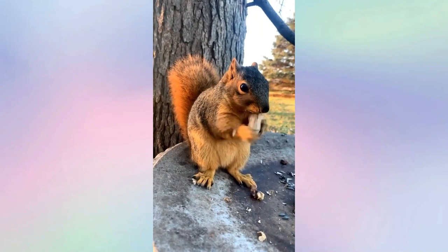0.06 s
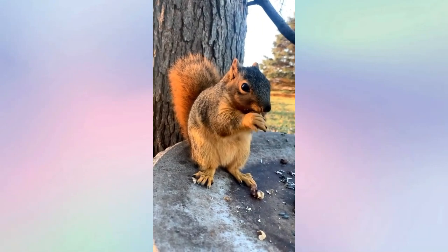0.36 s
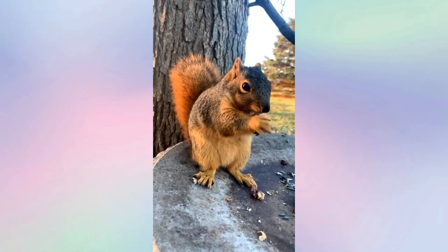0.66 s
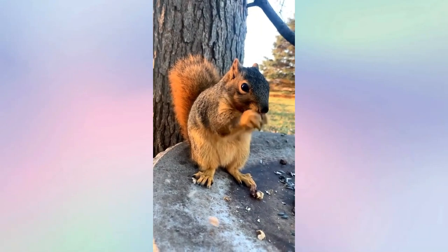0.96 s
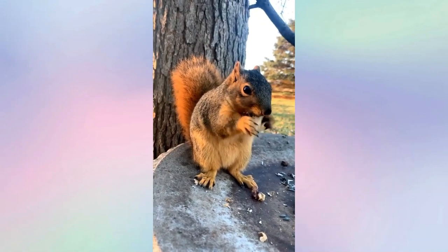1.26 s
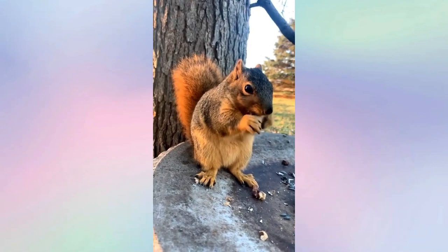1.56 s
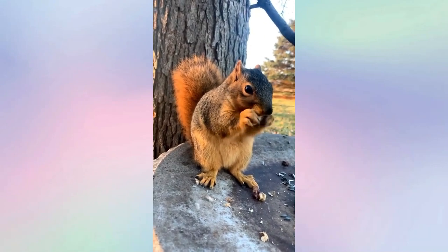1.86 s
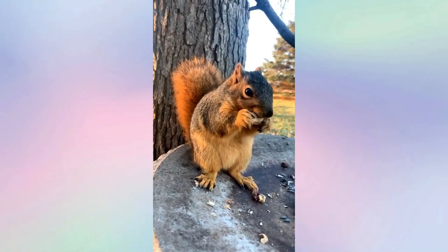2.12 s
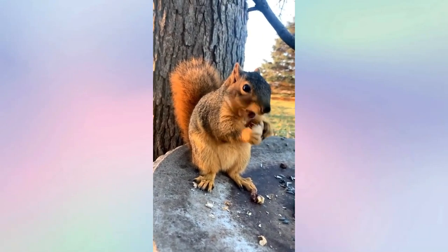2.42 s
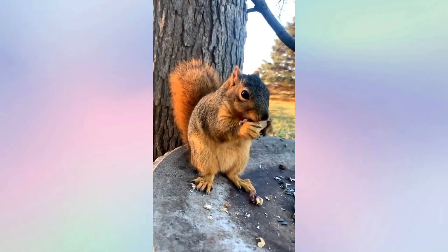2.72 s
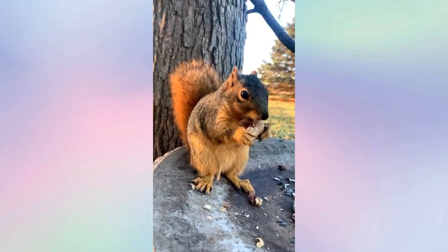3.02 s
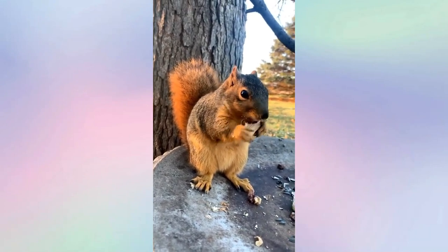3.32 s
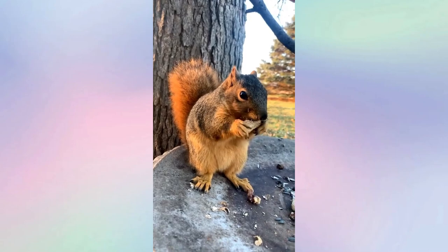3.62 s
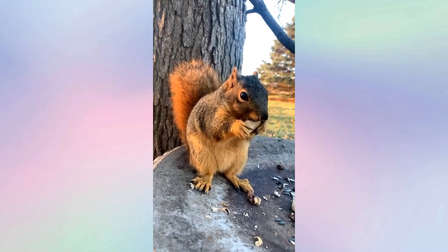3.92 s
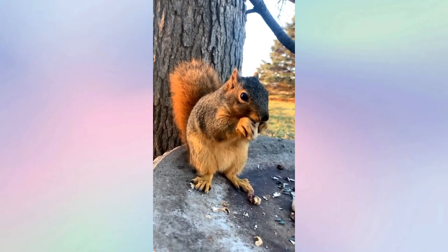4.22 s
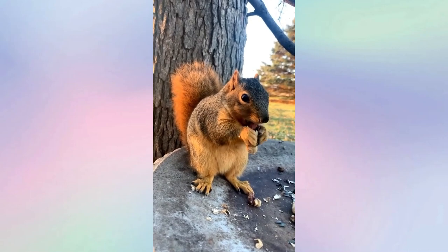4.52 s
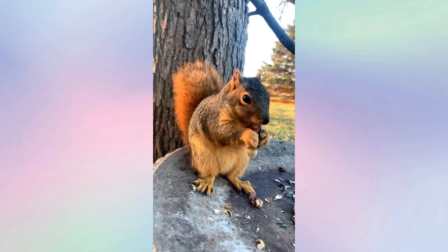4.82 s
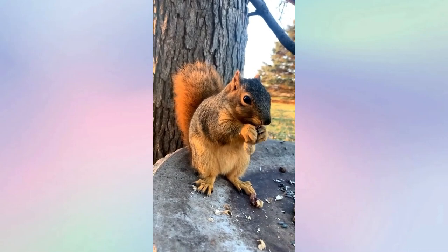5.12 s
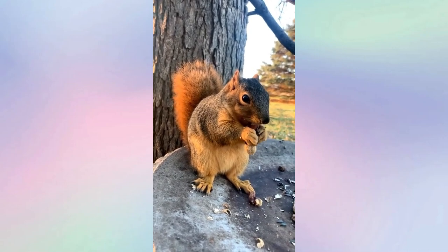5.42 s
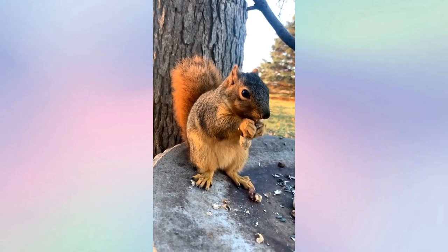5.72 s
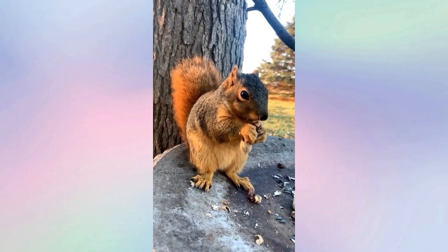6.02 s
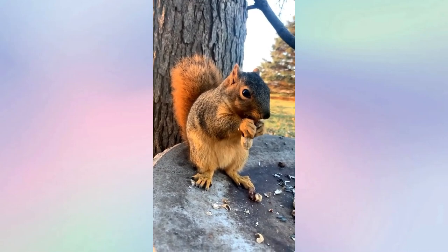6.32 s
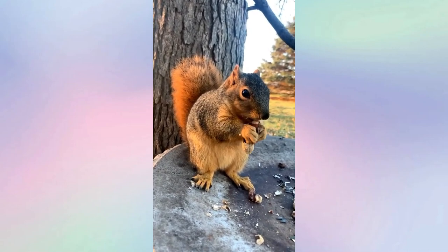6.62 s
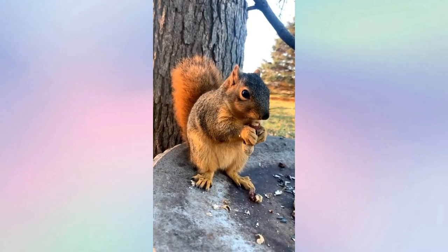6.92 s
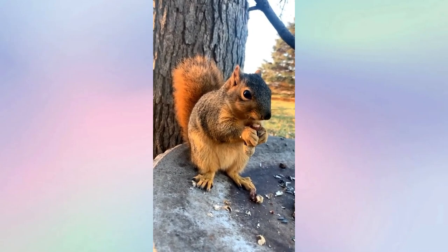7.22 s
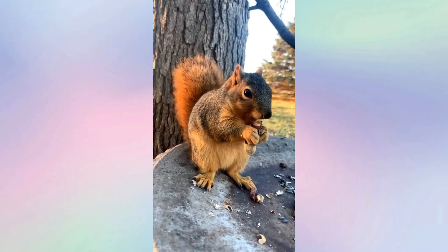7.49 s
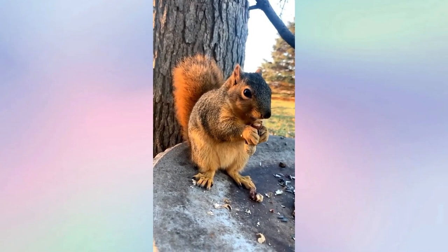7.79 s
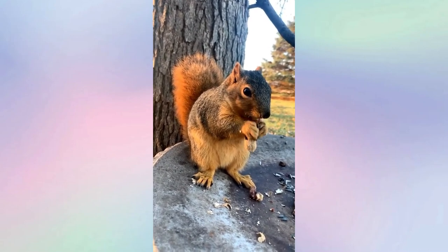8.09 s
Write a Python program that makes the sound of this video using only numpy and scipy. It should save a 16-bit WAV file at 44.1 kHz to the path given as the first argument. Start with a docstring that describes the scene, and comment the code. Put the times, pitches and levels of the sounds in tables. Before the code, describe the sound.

Crisp snaps of a nutshell give way to soft squirrel nibbling, with distant birds, faint barks and low traffic behind.

```python
"""A concrete table in a park, one microphone close to a squirrel, distant traffic rumbling throughout.
Far birds, probably jays, start to whistle as the squirrel splits a nut shell with its teeth: each
fracture is a sharp snap among crumbs, mirrored by the table top and answered faintly by the trees.
From about 3.5 s the jays also squawk and a dog barks far away, while the squirrel nibbles the kernel
with short scrapes, softer cracks and small ticks of the teeth."""
import sys
import numpy as np
from scipy import signal
from scipy.fft import rfft, irfft, next_fast_len
from scipy.io import wavfile
from scipy.ndimage import map_coordinates

SR = 44100
rng = np.random.default_rng(int(sys.argv[2]) if len(sys.argv) > 2 else 0)


def store_pcm(level_fs):
    """Save levels as 16-bit WAV."""
    pcm = np.round(np.clip(level_fs, -1, 1) * 32767).astype(np.int16)
    wavfile.write(sys.argv[1], SR, np.atleast_2d(pcm).T)


N = 359415

# the colour of breaking shell, close up: (frequency [Hz], relative level [dB])
SHELL_SPECTRUM = [(100, -22), (400, -20.5), (1100, -16.5), (1900, -7.5), (2700, -3), (3500, 0.5),
                  (4500, -2.5), (6300, -5), (8200, 0.5), (10500, -4.5), (13000, -5.5), (15800, -15)]


def amp(db):
    """Decibels to gain."""
    return 10 ** (np.asarray(db) / 20)


def unit(x):
    """Scale to rms 1."""
    return x / np.sqrt(np.mean(x ** 2) + 1e-20)


def along(points, hz):
    """(Hz, value) points read on a log axis."""
    f, v = np.transpose(points)
    return np.interp(np.log(hz + 1), np.log(f + 1), v)


def wobble(rate):
    """A smooth random curve, rate knots a second."""
    return map_coordinates(rng.standard_normal(int(N * rate / SR) + 4), [np.arange(N) * rate / SR])


def filtered(x, gain):
    """x times a gain that depends on frequency."""
    size = next_fast_len(N + SR // 2)
    return irfft(rfft(x, size) * gain(np.fft.rfftfreq(size, 1 / SR)), size)[:N]


def coloured(x, spectrum):
    """x shaped by a spectrum, at rms 1."""
    return unit(filtered(x, lambda hz: amp(along(spectrum, hz))))


def add(track, s, sound):
    """Mix a sound into the track at time s."""
    start = int(np.clip(round(s * SR), 0, N))
    track[start:start + len(sound)] += sound[:N - start]


def trees(size=256):
    """The diffuse echo from the trees, at energy 1, the highest treble dying first."""
    # the echo's decay: (frequency [Hz], time to fall 60 dB [s])
    decay = [(300, 0.42), (6000, 0.58), (15000, 0.18)]
    hz, t, noise = signal.stft(rng.standard_normal(SR // 3), SR, nperseg=size)
    tail = signal.istft(noise * amp(-60 * t / along(decay, hz)[:, None]), SR, nperseg=size)[1]
    return tail / np.linalg.norm(tail)


def surroundings(table_s=.0034, table_db=-13, scatter_db=-14, scatter_t60=.01, trees_db=-24):
    """Nut to microphone: direct path, bounce off the table, nearby scatter and the far echo."""
    path = amp(trees_db) * trees()
    t = np.arange(len(path)) / SR
    scatter = rng.standard_normal(len(t)) * amp(-60 * t / scatter_t60)
    path += amp(scatter_db) * scatter / np.linalg.norm(scatter)
    path[0] += 1
    add(path, table_s, np.array([amp(table_db)]))
    return path


def traffic(level_db=-49, rise_db=1.5, waver_db=.8):
    """Distant traffic: a low rumble that wavers and slowly grows."""
    # the rumble's colour: (frequency [Hz], relative level [dB])
    rumble = [(15, -30), (30, -12.5), (48, 5), (62, -2), (80, 1.5), (98, -7.5), (113, 0), (132, -13),
              (160, -13), (210, -25.5), (320, -30), (1500, -82.5)]
    swell_db = np.linspace(-.5, .5, N) * rise_db + waver_db * wobble(4.4)
    return amp(level_db + swell_db) * coloured(rng.standard_normal(N), rumble)


def open_air(level_db=-64):
    """The soft, drifting hiss of open air around the microphone."""
    # the hiss's colour: (frequency [Hz], relative level [dB])
    hiss = [(100, 9.5), (400, -2), (1100, -2), (1600, -5), (3000, -10), (6000, -16.5), (9000, -15),
            (13000, -24), (15500, -51.5)]
    return amp(level_db + wobble(.56)) * coloured(rng.standard_normal(N), hiss)


def crackle(rate, spread_db):
    """Random tiny breaks of uneven size, rate a second, at rms 1."""
    sizes = amp(spread_db * np.clip(rng.standard_normal(N), -2, 2))
    breaks = (rng.random(N) < rate / SR) * sizes * rng.choice([-1, 1], N)
    return coloured(signal.fftconvolve(breaks, surroundings(scatter_db=3.5))[:N], SHELL_SPECTRUM)


def scraping():
    """Grainy friction on the nut, at rms 1."""
    return unit(amp(3 * wobble(400)) * coloured(rng.standard_normal(N), SHELL_SPECTRUM))


def paws(scrape, start_db=-61.5, calm_db_per_s=1.5):
    """The paws turn the food with a faint crackle, ever more quietly."""
    t = np.arange(N) / SR
    handling = unit(amp(4 * wobble(20)) * (crackle(rate=160, spread_db=3) + .5 * scrape))
    return amp(start_db - calm_db_per_s * t) * handling


def jay_note(hz, rasp, dull_db):
    """A jay's note on a pitch contour: rasp shakes the pitch, dull_db tilts partials above the second."""
    # the bird's throat: (frequency [Hz], relative level [dB])
    throat = [(1000, -23.5), (1500, -12.5), (1750, -17.5), (2800, -5.5), (4300, -8.5), (5800, -11.5),
              (8000, -25)]
    part = rng.integers(N - len(hz)) + np.arange(len(hz))
    shake = rasp * wobble(700)[part] + .014 * wobble(45)[part]
    phase = 2 * np.pi * np.cumsum(hz * (1 + shake)) / SR
    voice = sum(amp(along(throat, k * hz) + dull_db * max(k - 2, 0)) * np.sin(k * phase)
                for k in range(1, 5))
    swell = np.sqrt(np.abs(np.sin(np.linspace(0, np.pi, len(hz)))))
    return swell * unit(voice * amp(4 * wobble(70)[part]))


def whistles(scoop=.4, scoop_s=.027, arch=.2):
    """Clear jay whistles that scoop up to a wavering note and sag at the end."""
    # the whistles: (time [s], length [s], level [dB], pitch [Hz])
    calls = [(0.281, 0.14, -66.5, 1450), (0.725, 0.1, -61, 1330), (1.267, 0.24, -64, 1418),
             (3.333, 0.13, -55, 1800), (3.941, 0.13, -65, 1914), (4.496, .12, -62.5, 1495),
             (4.758, .13, -64, 1642), (5.915, .08, -84, 1700), (6.103, .24, -67.5, 1455),
             (6.402, 0.15, -68, 1567), (7.153, 0.11, -69, 1407), (8.022, 0.095, -65.5, 1375)]
    track = np.zeros(N)
    for s, length, db, pitch_hz in calls:
        progress = np.linspace(0, 1, int(length * SR))
        below = scoop * np.exp(-(progress * length / scoop_s) ** 2 / 2)
        sag = arch * np.maximum(progress - .5, 0) ** 2
        add(track, s, amp(db) * jay_note(pitch_hz * (1 - below - sag), rasp=.028, dull_db=-9))
    return track


def far_jays(echo_db=-5):
    """Whistles and squawks from far off, with their echo from the trees."""
    calls = whistles() + squawks()
    echo = amp(echo_db) * signal.fftconvolve(calls, trees())[:N]
    return (calls + echo) / np.hypot(1, amp(echo_db))


def nibbling(scrape, stroke_s=.009, squeak_hz=5650, squeak_q=7):
    """Close up, each stroke of the incisors is a short scrape that may squeak."""
    # the strokes: (time [s], level [dB], share of squeak [0-1])
    strokes = [(0.412, -56, 0), (0.696, -51.5, .1), (2.082, -50.5, 0), (2.608, -49, 0), (3.692, -57, 0),
               (4.165, -50.5, 0), (4.204, -56, 0.6), (4.324, -57.5, 0.2), (4.389, -54.5, 0.44),
               (4.547, -56.5, 0.88), (4.77, -51.5, 0.3), (5.148, -58.5, 0.01), (5.237, -64.5, 0.5),
               (5.268, -61, 0.4), (5.997, -51.5, 0.86), (6.59, -54, 0)]
    t = np.arange(N) / SR
    squeak = unit(signal.lfilter(*signal.iirpeak(squeak_hz, squeak_q, SR), scrape))
    track = np.zeros(N)
    for s, db, share in strokes:
        near = np.abs(t - s) < 10 * stroke_s
        envelope = amp(db) * np.exp(-((t[near] - s) / stroke_s) ** 2 / 2)
        track[near] += envelope * (np.sqrt(1 - share) * scrape[near] + np.sqrt(share) * squeak[near])
    return track


def snap(level_db, lag_s=.0008):
    """An abrupt causal pulse with this spectrum; its low notes trail, by lag_s at 800 Hz."""
    cepstrum = irfft(np.log(amp(level_db)))
    half = len(cepstrum) // 2
    cepstrum[1:half] *= 2  # fold to minimum phase
    cepstrum[half + 1:] = 0
    cycles = lag_s * 1000 * np.log1p(np.linspace(0, SR / 2, half + 1) / 200)
    return irfft(np.exp(rfft(cepstrum) - 2j * np.pi * cycles))


def fracture(bright_db, crumble, lead, build_t60=.031, crumb_t60=.027, strain_db=-10, split_s=.00059):
    """A main snap, lead samples in, amid tiny breaks that build up before it and die after it."""
    # how brightness tilts the shell's colour: (frequency [Hz], weight on bright_db [factor])
    tilt = [(2200, -1.52), (5500, -0.65), (8800, 0.69), (14000, 0)]
    hz = np.fft.rfftfreq(lead, 1 / SR)
    # the size of the fragment moves the resonances about
    ripple_db = 3 * np.interp(hz, np.linspace(0, SR / 2, 36), rng.standard_normal(36))
    pulse = snap(along(SHELL_SPECTRUM, hz) + bright_db * along(tilt, hz) + ripple_db)
    t = np.arange(-lead, lead) / SR
    spray = amp(np.where(t < 0, strain_db + 60 * t / build_t60, -60 * t / crumb_t60))
    crumbs = spray * rng.standard_normal(len(t))
    crumbs *= np.exp(.9 * np.clip(rng.standard_normal(len(t)), -2, 2))  # uneven sizes
    breaks = np.sqrt(crumble) * crumbs / np.linalg.norm(crumbs)
    # the main split takes a moment to run through the shell
    split = np.exp(-np.abs(t) / split_s) * rng.standard_normal(len(t))
    split /= np.linalg.norm(split)
    split[lead] += 2
    breaks += np.sqrt(1 - crumble) * split / np.linalg.norm(split)
    crack = np.convolve(breaks, pulse)
    return signal.fftconvolve(crack / np.linalg.norm(crack), surroundings())


def cracks(lead=512):
    """Close to the microphone, hard bites split the shell; later, softer ones split the kernel."""
    # the loudest cracks: (time [s], direct energy [dB], brightness [dB], share of crumbling [0-1])
    bites = [(0.4675, -7.5, 14, 0), (0.4829, 5, 2, 0.09), (0.5119, -1, 5.5, 0.06), (0.5387, -14, 7, 0),
             (0.5622, 6, -.5, 0.05), (0.6729, -17.5, 17, 0.06), (0.734, -16, 4.5, 0.7),
             (0.773, -7.5, 3.5, 0.97), (0.9164, -21, 3, 0.27), (0.97, -15.5, 13, 0.7), (1.082, -9.5, 7, 1),
             (1.111, 1, 8.5, 0.5), (1.118, -3.5, 2.5, 0.47), (1.307, -18, 4.5, 0.24), (1.462, -17, 4, 0.8),
             (1.4811, -6, 5, 0.31), (1.554, -20, -1, 0.13), (1.5861, -6.5, 6, 0.86), (1.6187, -19, 0, 0),
             (1.632, 3.5, 5, 0.07), (1.6367, 2, 1.5, 0.1), (1.8475, -8.5, 3, 0.3), (2.1123, -4.5, -4, 0),
             (2.1202, 2, 3.5, 0.3), (2.131, 4, 6.5, 0.06), (2.159, -8, 5.5, 0.5), (2.179, -13, 1, 0.3),
             (2.189, -1.5, 4, 0.09), (2.3, -11, -5.5, 0.72), (2.357, -4, 0, 0.58), (2.3901, -3.5, -1, 0.09),
             (2.6517, -19.5, -4.5, 0.66), (2.6908, -1, 3, 0.86), (2.701, -2, -0.5, 0.03),
             (2.771, -18.5, 2, 0.85), (2.8304, -16.5, 1.5, 0.85), (3.006, -11.5, -3.5, 0.36),
             (3.317, -1, 3.5, 0.92), (3.329, 0, 5, 0.3), (3.354, -4, 3, 0.66), (3.38, -5, 0, 1),
             (3.819, -26.5, 2.5, 0.2), (5.2095, -21.5, 1, 0.1), (5.616, -24, 5, 0.2), (5.74, -30, 2, 0.5),
             (5.794, -32.5, -6.5, 0.3), (5.885, -32, 1, 0.4), (6.3666, -9.5, 4.5, 0.27),
             (6.464, -5, 11.5, 0.1), (6.6204, -18, 8, 0.2), (7.0021, -33, -2, 0.3), (7.695, -23, 3, 0.18),
             (7.8453, -10, 14.5, 0.05)]
    track = np.zeros(N)
    for s, db, bright_db, crumble in bites:
        add(track, s - lead / SR, amp(db) * fracture(bright_db, crumble, lead))
    return track


def chips(bites, relative_db=-21, follow=.52, loud_db=-30, reach_s=.018):
    """Fine grit breaks off around every bite, growing with its force."""
    window = signal.windows.hann(int(2 * reach_s * SR))
    force = np.sqrt(np.abs(signal.fftconvolve(bites ** 2, window / window.sum(), "same")))
    envelope = amp(relative_db + loud_db) * (force / amp(loud_db)) ** follow
    return envelope * crackle(rate=600, spread_db=16)


def squawks(chirp_s=.06, step_s=.032, fall=.16, chirp_fall=.17, leap=.055):
    """Harsh jay squawks, each a jumble of falling chirps ringing in the beak."""
    # the squawks: (time [s], length [s], chirp level [dB], pitch halfway [Hz], beak resonance [Hz])
    calls = [(3.504, 0.21, -62.5, 1468, 3240), (4.085, 0.11, -67, 1525, 3660),
             (4.551, 0.12, -64, 1427, 3000), (4.664, 0.077, -55.5, 1523, 4600),
             (4.748, 0.12, -62, 1399, 3000), (6.188, 0.15, -65, 1430, 4104), (6.467, .13, -65, 1378, 3000),
             (7.06, 0.11, -64.5, 1372, 3730), (7.269, 0.14, -71, 1392, 4100), (7.64, 0.06, -69, 1690, 4940)]
    track = np.zeros(N)
    dive = 1 - chirp_fall * np.linspace(-.5, .5, int(chirp_s * SR))
    for s, length, db, pitch_hz, beak_hz in calls:
        for k, late in enumerate(np.arange(0, max(length - chirp_s, 0) + step_s / 2, step_s)):
            # the chirps leap alternately up and down, and sink and soften as the squawk goes on
            past_middle = (late + chirp_s / 2) / length - .5
            sink = 1 - fall * past_middle
            chirp_hz = pitch_hz * (sink + leap * (-1) ** k * (.5 + rng.random()))
            voice = jay_note(chirp_hz * dive, rasp=.048, dull_db=0)
            chirp = signal.lfilter(*signal.iirpeak(beak_hz * sink, 1.5, SR), voice)
            add(track, s + late, amp(db) * (1 - past_middle / 2) * unit(chirp))
    return track


def far_dog(pitch_hz=343, fall=.14, gain_db=1, echo_db=-7):
    """Short hoarse barks of falling pitch, far off, echoed by the trees."""
    # the barks: (time [s], level before gain_db [dB], length [s])
    barks = [(3.639, -63, 0.086), (4.845, -62, 0.042), (4.928, -55.5, 0.047), (5.373, -59, 0.03),
             (5.496, -53.5, 0.075), (6.513, -55.5, 0.04)]
    # the dog's throat heard from afar: (frequency [Hz], relative level [dB])
    throat = [(150, -28), (330, 3.5), (640, 8), (950, -2), (1400, -9), (2500, -34)]
    track = np.zeros(N)
    hoarse = coloured(rng.standard_normal(N), throat)
    for s, db, length in barks:
        progress = np.linspace(0, 1, int(SR * length))
        phase = 2 * np.pi * np.cumsum(pitch_hz * (1 - fall * progress)) / SR
        voice = sum(amp(along(throat, k * pitch_hz)) * np.sin(k * phase) for k in range(1, 6))
        rasp = hoarse[int(s * SR):][:len(progress)]
        envelope = np.abs(np.sin(np.pi * progress ** .48))
        add(track, s, amp(db + gain_db) * unit(unit(voice) + rasp) * envelope)
    return track + amp(echo_db) * signal.fftconvolve(track, trees())[:N]


def teeth(ring_q=7, click_db=-17, lead=512):
    """The squirrel's teeth meet in soft clicks, each ringing briefly in the mouth."""
    # the ticks: (time [s], energy [dB], ring [Hz])
    ticks = [(4.483, -30, 3390), (6.6207, -21.5, 1670), (6.809, -33, 3580), (6.89, -32.5, 2670),
             (6.945, -35, 3520), (7.3157, -27, 2570), (7.845, -29, 2120), (8.0066, -27.5, 3550)]
    track = np.zeros(N)
    for s, db, ring_hz in ticks:
        click = fracture(bright_db=0, crumble=0, lead=lead)
        tick = signal.lfilter(*signal.iirpeak(ring_hz, ring_q, SR), click) + amp(click_db) * click
        add(track, s - lead / SR, amp(db) * tick / np.linalg.norm(tick))
    return track


def scene():
    """The squirrel close in front, the park far behind, in mono."""
    bites = cracks()
    biting = bites + chips(bites) + teeth()
    scrape = scraping()
    squirrel = biting + nibbling(scrape) + paws(scrape)
    return (squirrel + far_jays() + far_dog() + traffic() + open_air())[None]


def record(dry):
    """The camera's microphone channel cuts off steeply at its band limit."""
    top_hz = 15900
    return filtered(dry[0], lambda hz: 1 / np.sqrt(1 + (hz / top_hz) ** 120))[None]


dry = scene()
out = record(dry)
store_pcm(out)
```